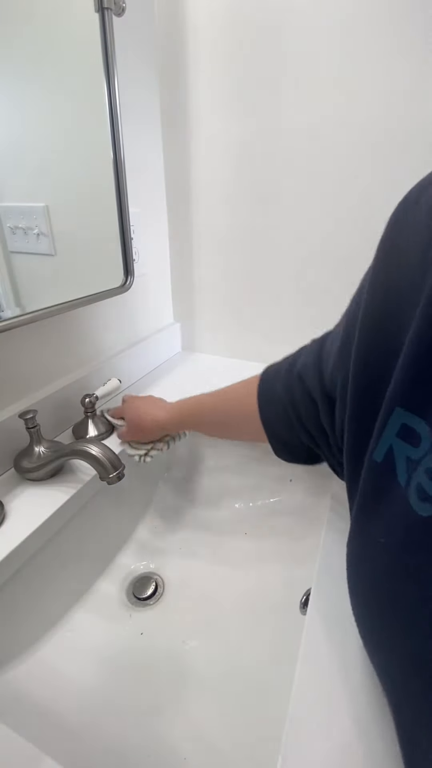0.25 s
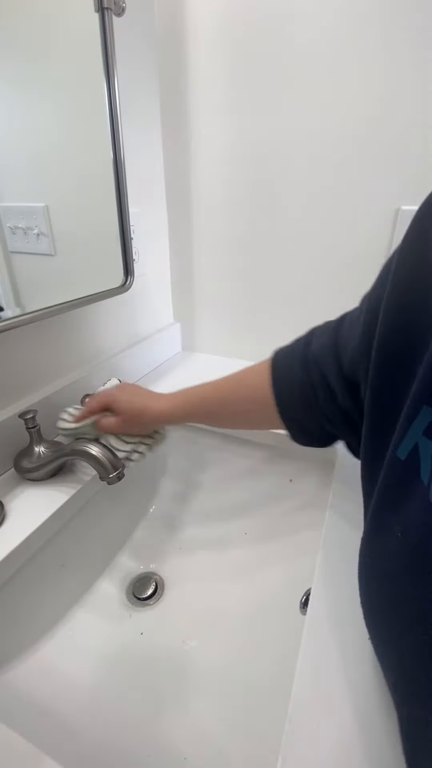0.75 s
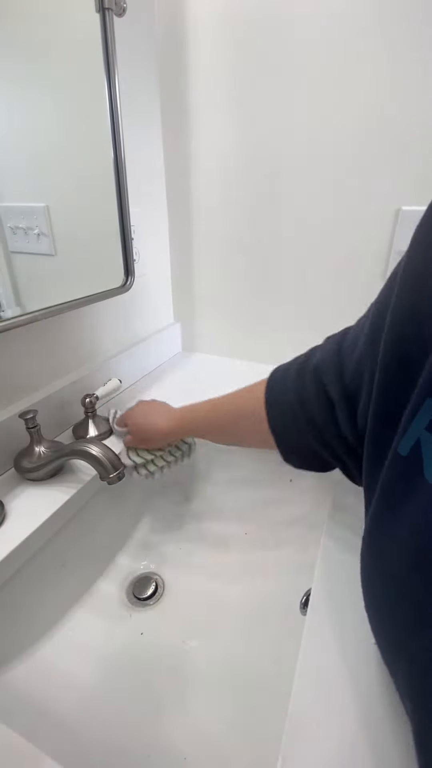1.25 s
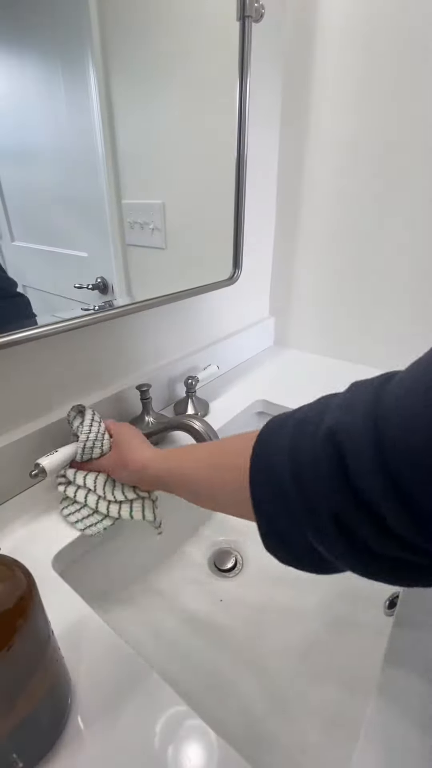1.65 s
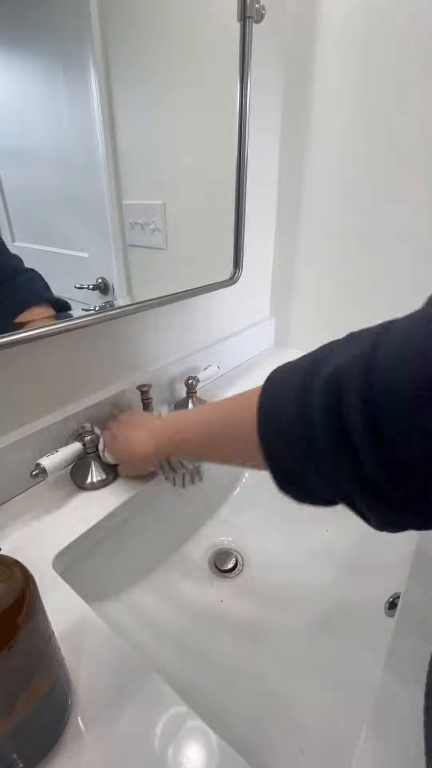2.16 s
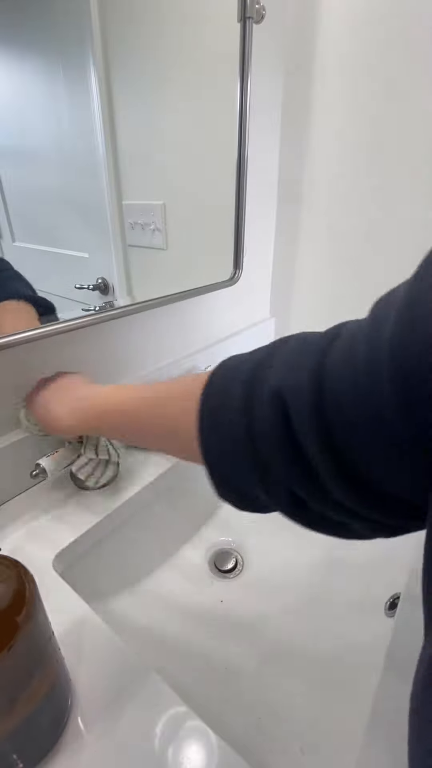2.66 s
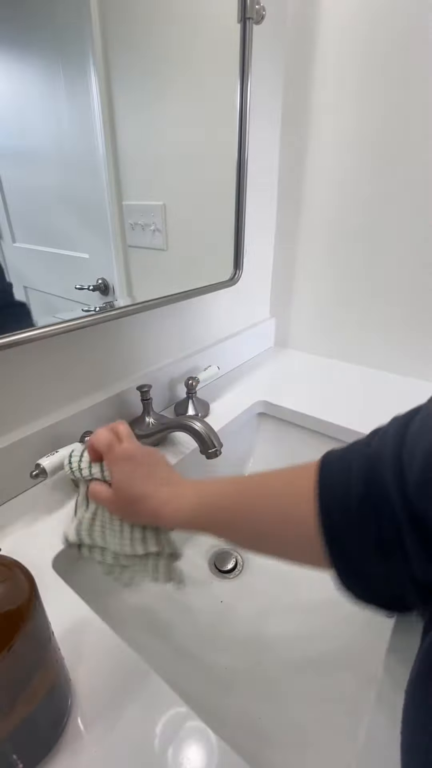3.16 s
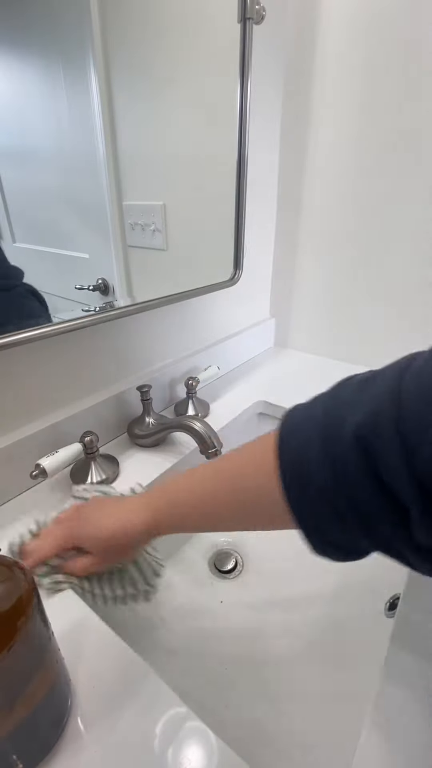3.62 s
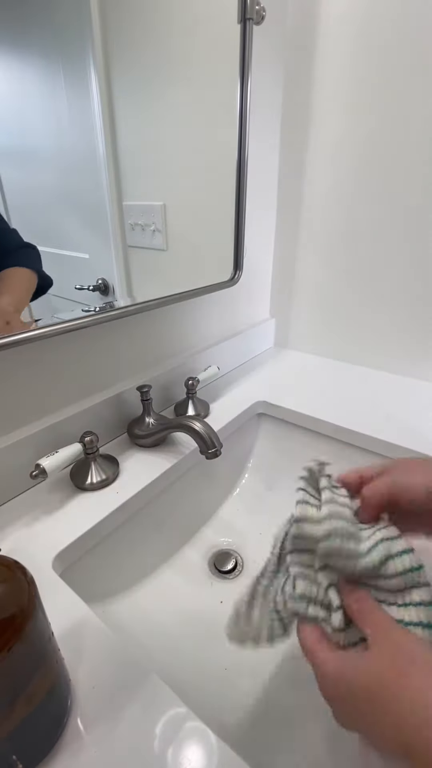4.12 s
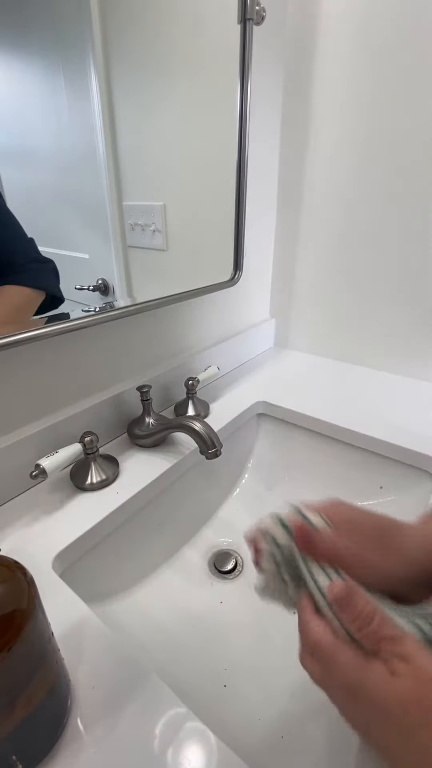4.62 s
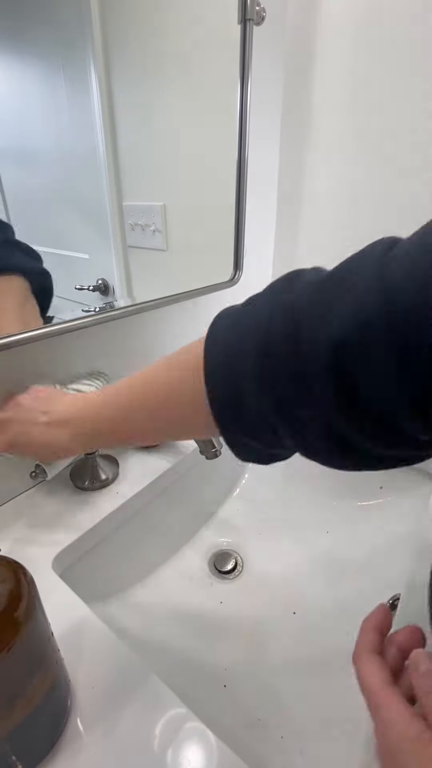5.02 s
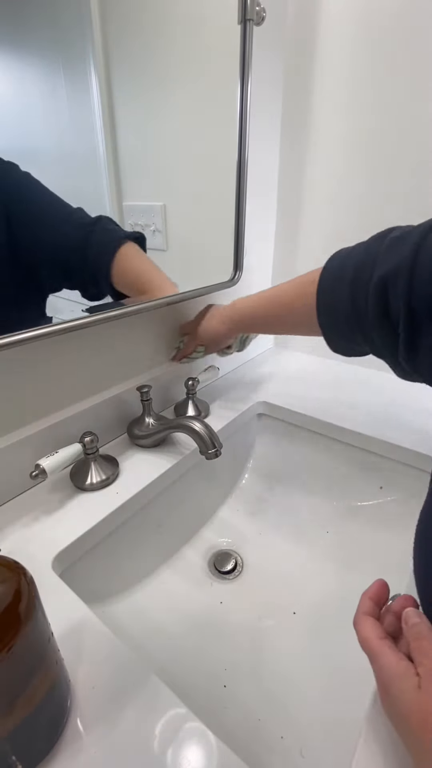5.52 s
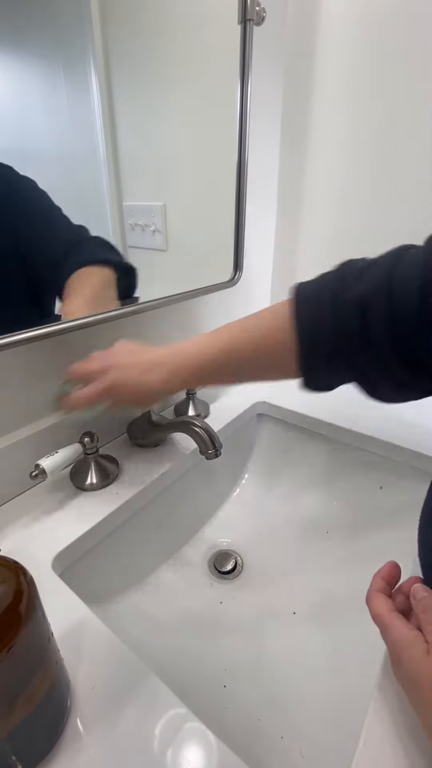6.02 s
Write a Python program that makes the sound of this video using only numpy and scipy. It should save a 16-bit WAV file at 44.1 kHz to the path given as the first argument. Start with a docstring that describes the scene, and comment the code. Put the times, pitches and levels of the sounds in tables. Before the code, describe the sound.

Quiet, close cloth wiping around a sink, light bumps and fitting clicks, one loud clack-and-thump, a tiny squeak, then two stronger swipes.

```python
"""A cloth wipes a bathroom counter in short strokes of filtered noise, over a motor's steady hum of sines.
Early on a hollow note wavers in the basin; bumps boom in the cabinet as swelling sines, and fittings click
as spikes with dying modes. Halfway, a sharp clack at 2.9 s is followed at once by a heavy thump; then the cloth
squeaks once, a gliding tone. Lighter bumps and clicks go on, then two louder strokes close the scene.
Short grainy bursts (cloth folds, brief rattles round the clack) and a low, uneven drag (dark noise) run along."""
import sys
import numpy as np
from scipy import signal
from scipy.fft import rfft, irfft
from scipy.io import wavfile
from scipy.ndimage import uniform_filter1d

SR = 44100
rng = np.random.default_rng(int(sys.argv[2]) if len(sys.argv) > 2 else 0)


def materialize(psi):
    """Save the field psi as 16-bit PCM at rate SR to the path in sys.argv[1].

    A 1-D psi becomes a single channel; in a 2-D psi each row is a channel.
    """
    bounded = np.clip(np.atleast_2d(psi).T, -1, 1)
    quanta = np.round(bounded * 32767).astype(np.int16)
    wavfile.write(sys.argv[1], SR, quanta)


N = 276948
TIME, BINS = np.arange(N) / SR, np.fft.rfftfreq(N, 1 / SR)
CONTROL_TIME = TIME[::32]  # coarser clock for the stroke envelopes

# Strokes of the cloth. Each row: start in seconds, length in seconds, relative hiss in dB, swell from start
# to end in dB, brightness in dB per octave, rasp in dB, rumble in dB, relative scuff in dB.
STROKES = [(-0.03, 0.14, -66.5, -1, -2.5, 1.5, -70, -76.5), (0.087, 0.13, -66.5, -10, -4.5, 5, -58.5, -94),
           (0.174, 0.17, -60.5, -5.5, -2.5, 4.5, -66, -84), (0.322, 0.099, -60.5, 1, -2, 0.5, -66.5, -88),
           (0.445, 0.043, -67.5, -5, 0, 1, -58.5, -73.5), (0.509, 0.18, -63, 7, -1.5, 0.5, -57, -82),
           (0.763, 0.11, -63, -3.5, -2, -1.5, -56.5, -77), (0.853, 0.22, -62, 7, -2.5, 2, -65, -79),
           (1.112, 0.18, -58, 8.5, -2, 2, -68.5, -73.5), (1.328, 0.29, -73.5, 4, -0.5, -5, -67.5, -76),
           (1.482, 0.3, -70, 7, -1.5, 0, -72, -79.5), (1.821, 0.15, -71, 15, -2.5, -1, -66.5, -74),
           (1.977, 0.14, -70, -2, -2, -2, -73, -74), (2.096, 0.11, -63.5, -7, -5.5, -10, -61.5, -65.5),
           (2.204, 0.1, -63.5, 1, -3.5, -1, -63.5, -71), (2.501, 0.049, -76, 1, 6.5, 2, -62, -69.5),
           (2.55, 0.08, -59.5, -6, -2, 3.5, -61.5, -67.5), (2.636, 0.2, -52.5, 0.5, 0, 3.5, -91, -70.5),
           (2.836, 0.57, -78.5, -37, 2, -3, -73, -69.5), (3.2, 0.11, -71, 2, -1.5, -2, -58.5, -76),
           (3.28, 0.12, -62.5, -11, -5.5, -12, -65, -66.5),
           (3.359, 0.31, -65.5, 0, -2.5, -5.5, -65.5, -72.5), (3.713, 0.21, -70.5, 10, 1, 3.5, -66, -81),
           (3.886, 0.29, -69, -20.5, 2, 0, -70.5, -73), (4.225, 0.12, -76, -14, 1.5, 3.5, -75, -96),
           (4.374, 0.047, -76, 6, -2, -2, -66, -84), (4.46, 0.26, -72, 5, -3, -0.5, -68.5, -75.5),
           (4.733, 0.076, -72, -1.5, -5, -9, -65, -67.5), (4.82, 0.34, -81, -11, -4.5, 1.5, -66, -91),
           (5.02, 0.7, -58, -4, 0, 1, -70.5, -66), (6.109, 0.38, -56, -6.5, -1.5, -3, -65.5, -66.5)]
# Short grainy bursts in bands of their own: cloth folds, and brief rattles around the clack and thump.
# Each row: start in seconds, length in seconds, level in dB, centre in Hz, width in octaves.
BURSTS = [(0.076, 0.1, -70, 1540, 0.17), (0.205, 0.092, -68.5, 1200, 0.96), (1.014, 0.049, -72, 1100, .6),
          (1.725, .09, -72, 1330, 0.47), (2.226, 0.038, -70, 1500, 0.77), (2.899, 0.004, -46, 2950, 0.24),
          (2.953, 0.11, -65.5, 2530, 1), (3.013, 0.033, -54, 5440, 0.96), (3.048, 0.052, -63.5, 1930, .3),
          (3.343, 0.12, -79, 1500, 0.36), (3.621, 0.049, -61.5, 1340, 0.4), (3.867, .21, -84, 1860, 1),
          (3.854, 0.27, -65, 5200, 0.65), (4.562, 0.035, -68.5, 1390, 1), (4.664, 0.045, -69, 1200, 1),
          (4.782, .02, -75, 1400, 0.98), (4.857, 0.028, -74, 1200, 1), (5.086, 0.36, -70.5, 1280, 0.44)]
# The one squeak on the glaze: start in seconds, length in seconds, pitch in Hz, glide in Hz per second, level in dB.
SQUEAK = (3.312, .115, 1185, 150, -60.5)
# Bumps on the counter. Each row: start in seconds, boom in dB, boom pitch at its peak in Hz, time to swell
# in seconds, relative knock in dB, knock brightness in dB per octave, ring of the slab in dB.
BUMPS = [(0.067, -51.5, 230, 0.021, -47, -11, -69.5), (0.178, -48, 135, 0.02, -57, 2, -83),
         (0.528, -28.5, 145.5, 0.031, -38, -9.5, -99), (0.585, -46.5, 157, 0.032, -72, -23, -94),
         (0.819, -45, 142, 0.022, -56, -2, -91), (1.304, -46.5, 170, 0.0025, -48, -1.5, -66),
         (1.839, -48.5, 205, 0.0054, -57, 0, -64), (2.161, -46.5, 196, 0.0068, -37, -6, -61),
         (2.184, -50.5, 203, 0.019, -52.5, 5.5, -72), (2.963, -9, 150.4, 0.02, -32, 1, -49.5),
         (3.0, -34.5, 190, 0.012, -31.5, 5, -49.5), (3.025, -29, 157.4, 0.028, -28, -5.5, -54),
         (3.356, -46.5, 152, 0.018, -50, 10, -77), (3.635, -42, 147, 0.023, -43.5, -8, -69),
         (3.775, -48.5, 145.4, 0.03, -65, -22, -74), (3.956, -51, 146, 0.0065, -69, -2, -78),
         (4.23, -54, 145, 0.014, -54.5, -12, -79.5)]
# Low modes of cabinet and room. Each row: pitch in Hz, level against the boom in dB, t60 in seconds.
CABINET_MODES = [(103.9, -18.5, 0.46), (135, -5.5, 0.35), (164, -17, 0.36), (211.6, -6, 0.2)]
# Modes of the slab under a bump. Each row: pitch in Hz, relative level in dB, t60 in seconds.
SLAB_MODES = [(301.5, -1, 0.39), (400, -13, 0.047), (463, -2.5, 0.36), (673, 5.5, 0.14), (744, 4, .22),
              (885, 4.5, 0.12), (960, -9.5, 0.08), (1030, -6, 0.1), (1130, 0.5, 0.28), (1320, -8.5, 0.17),
              (1430, -10, 0.097), (1800, -21, 0.17), (2230, -28, 0.22), (2230, -22.5, 0.24)]
# Clicks on the fittings. Each row: start in seconds, level in dB, brightness in dB per octave,
# ring against the crack in dB.
CLICKS = [(1.309, -38, 1, -12), (1.558, -29, 2.5, -26), (2.897, -32.5, -9, -33), (2.908, -10.5, 0.5, -12.5),
          (2.921, -27, -4, -24), (2.929, -35.5, 0, -20), (3.0181, -28, 6.5, -31), (4.239, -55, 9, -31),
          (4.785, -49, 6, -22)]
# Modes of the metal fittings. Each row: pitch in Hz, relative level in dB, t60 in seconds.
METAL_MODES = [(2440, -44, 0.06), (3070, -1.5, 0.015), (3620, -1, 0.0059), (4600, -3.5, 0.0086),
               (6360, -6, 0.014), (7600, -2, 0.0057), (8240, -5.5, 0.008), (9130, -8, .008),
               (10700, -9, 0.0033)]
# Modes of the basin, shaken through the tap. Each row: pitch in Hz, relative level in dB, t60 in seconds.
BASIN_MODES = [(700, -26.5, 0.37), (907, -22.5, 0.16), (1160, -13, .16), (1270, -7, 0.11),
               (1343, -4.5, 0.2), (1330, 16, 0.017), (1490, -13, 0.13), (1797, 7.5, 0.012),
               (1676, -24, 0.26), (2000, -4, 0.01)]
# Hollow note in the basin while the cloth works beside it. Each row: time in seconds, pitch in Hz, level in dB.
HOLLOW = [(0.29, 700, -99), (0.357, 679, -71), (0.68, 612, -79), (.82, 641, -69.5), (.98, 623, -92),
          (1.13, 632, -69), (1.38, 606, -87), (1.58, 647, -66), (1.749, 680, -106)]
# Tones of the hum. Each row: pitch in Hz, level in dB rms before the drift, depth of the wavering in dB.
HUM = [(139.5, -76, 2.5), (216.7, -66, 1.5), (259, -78.5, 3), (459, -88.5, 0.5), (598, -78.5, 0)]
# Drift of the hum's level. Each row: time in seconds, gain in dB.
HUM_LEVEL = [(0, -2), (1.25, -0.5), (1.4, 1.5), (2.4, 0), (6.28, 1.5)]

# Colours of the noises. Each row: frequency in Hz, relative density in dB per Hz.
CLOTH_COLOUR = [(200, -14.5), (700, -15.5), (1350, -10), (2100, -4.5), (3200, 0), (4400, 1.5), (6000, 0),
                (7500, 0.5), (9500, 4), (12000, 2.5), (16000, -2)]
RUMBLE_COLOUR = [(25, -44.5), (60, -17), (100, 5.5), (140, 4.5), (190, -10.5), (300, -25), (600, -60.5)]
SCUFF_COLOUR = [(120, -26), (260, -3.5), (420, -2), (640, 1), (900, -5), (1400, -10), (2200, -12.5),
                (6000, -23.5)]
KNOCK_COLOUR = [(30, -26.5), (100, -1), (300, 9.5), (440, 0), (700, 2), (950, -6), (1400, -11),
                (2300, -27.5), (5000, -42.5), (16000, -62)]
SHUDDER_COLOUR = [(15, -46), (28, -23), (45, -7), (90, -4.5), (150, -13), (400, -56)]  # the deep shudder under a blow
AIR_COLOUR = [(25, -34), (70, -5), (130, 6), (220, 2), (380, -10), (600, -4), (900, -14), (1600, -20),
              (3000, -26), (7000, -28), (16000, -26)]
# Decay of the room. Each row: frequency in Hz, t60 in seconds.
ROOM_DECAY = [(300, 0.59), (1400, 0.24), (3500, 0.21), (9000, 0.07), (16000, 0.016)]
# Likeness of the two microphone ports. Each row: frequency in Hz, likeness from 0 to 1.
LIKENESS = [(150, .999), (300, .95), (600, .7), (850, .5), (1350, .72), (2000, .42), (3200, .75),
            (5500, .62), (9000, .62), (11000, .45), (12500, .85)]
# Phase between the ports. Each row: frequency in Hz, lead of the left in radians.
PORT_PHASE = [(40, 0), (160, -.07), (330, -.25), (650, -1), (1100, -2.5), (1600, -3.8), (2700, -6.1),
              (3400, -6), (4500, -4.9), (5600, -5), (6800, -5.8), (8200, -5), (9800, -5.9), (12000, -3.2),
              (14000, -3.1), (16000, -1.5)]
# Balance of the ports. Each row: frequency in Hz, left minus right in dB.
PORT_BALANCE = [(200, .4), (330, 0), (600, -4), (1300, -1.2), (4000, -1.8), (8000, -2), (13000, -.2)]

LIFT_DB_PER_S, SETTLE_DB_PER_S = 250.5, 157  # how fast the hiss, and the counter's shaking, die after a stroke
ATTACK_S, ATTACK_SHARE = 0.015, 0.064  # the hand gets up to speed in this time plus this share of the stroke
ARCH_DB = 2.5  # a stroke is this much quieter at its ends than in the middle
# The rasp of the weave: centre, width, and octaves it climbs during a stroke.
RASP_HZ, RASP_OCTAVES, RASP_SWEEP = 4500, 0.26, 0.15
BOOM_SAG_HZ_PER_S = 620  # every boom drops in pitch this fast
EDGE_HZ = 15900  # top of the ports' band


def cloth(hiss_db=2.0, snag_db=-8, snags_per_s=500, flutter_db=1.1, patchy_db=1.85, idle_db=-92):
    """Countless fibres slip as a soft hiss, a few threads snag and let go, and the pressed weave rasps."""
    start, length, level_db, _, bright_db, rasp_db = np.transpose(STROKES)[:6]
    gains = strokes(LIFT_DB_PER_S)
    # between strokes the cloth barely stirs
    level = np.hypot(played(gains, level_db), amp(idle_db))
    slide = level * amp(flutter_db * wander(29))

    snags = (rng.random(N) < snags_per_s / SR) * rng.laplace(size=N)
    fibres = amp(hiss_db) * noise(CLOTH_COLOUR)
    fibres[0] += amp(snag_db) * colour(snags, CLOTH_COLOUR)
    hz, t, z = signal.stft(fibres, SR, nperseg=1024)

    # where strokes overlap, each colours the hiss by its share of the gain
    shares = gains / (gains.sum(0) + 1e-3)
    share = np.array([np.interp(t, CONTROL_TIME, s) for s in shares])
    progress = np.clip((t - start[:, None]) / length[:, None], 0, 1)
    along = (share * progress).sum(0)
    off_centre = np.log2((hz[:, None] + 1) / RASP_HZ) - RASP_SWEEP * (along - .5)
    rasp = rasp_db @ share * np.exp(-(off_centre / RASP_OCTAVES) ** 2)

    # the hiss varies in colour by chance, in slow random patches
    patches = uniform_filter1d(rng.standard_normal(z.shape[1:]), size=7, axis=0)
    patches = unit(uniform_filter1d(patches, size=9, axis=1))
    octaves = np.log2(np.clip(hz, 1000, 16000) / 6000)[:, None]
    z = z * amp(patchy_db * patches + rasp + octaves * (bright_db @ share))
    return slide * signal.istft(z, SR, nperseg=1024)[1][:, :N]


def strokes(release_db_per_s):
    """One gain curve per stroke: a soft start, an arch that leans to one end, and a release."""
    start, length, _, swell_db = np.transpose(STROKES)[:4, :, None]
    age = np.maximum(CONTROL_TIME - start, 0)
    along = np.minimum(age / length, 1)
    arch_db = swell_db * (along - .5) - ARCH_DB * (2 * along - 1) ** 2
    release_db = release_db_per_s * np.maximum(age - length, 0)
    attack = 1 - np.exp(-(age / (ATTACK_S + ATTACK_SHARE * length)) ** 2)
    return attack * amp(arch_db - release_db)


def played(gains, levels_db):
    """The level over time of all strokes together, their powers summed, each at its own strength."""
    return np.interp(TIME, CONTROL_TIME, np.sqrt(amp(levels_db) ** 2 @ gains ** 2))


def grainy_bursts(grains_per_s=1500, hiss_db=-2, lean=.8):
    """Each burst is a short spray of soft crackles and hiss in a band of its own, swelling and fading."""
    out = np.zeros((2, N))
    for s, length, db, hz, octaves in BURSTS:
        along = np.clip(np.arange(16384) / SR / length, 0, 1)
        size = (2, len(along))
        grains = (rng.random(size) < grains_per_s / SR) * rng.laplace(size=size)
        hiss = amp(hiss_db) * rng.standard_normal(size)
        # a bell-shaped band, 7 dB down one width from its centre
        band = [(hz * 2 ** (k * octaves), -7 * k ** 2) for k in range(-3, 4)]
        spray = colour(unit(grains) + hiss, band)
        add(out, s, amp(db) * np.sin(np.pi * along ** lean) * spray)
    return out


def squeak(rough_hz=14, peak_share=0.19):
    """The cloth sticks and slips fast enough to give a short, slightly rough tone."""
    s, length, hz, glide, db = SQUEAK
    along = np.clip((TIME - s) / length, 0, 1)
    pitch = hz + glide * length * along + rough_hz * wander(110)
    turns = np.cumsum(pitch) / SR
    swell = np.interp(along, [0, peak_share, 1], [0, 1, 0])
    return np.array([amp(db) * swell * np.sin(2 * np.pi * turns), np.zeros(N)])


def drag(scuff_db=3, uneven_db=2):
    """In each stroke the hand's weight catches and slips: an uneven rumble of the counter and scuff of the basin."""
    low_db, mid_db = np.transpose(STROKES)[-2:]
    gains = strokes(SETTLE_DB_PER_S)
    grip_db = uneven_db * wander(16.0)
    rumble = played(gains, low_db) * noise(RUMBLE_COLOUR)
    scuff = played(gains, mid_db + scuff_db) * noise(SCUFF_COLOUR)
    return amp(grip_db) * (rumble + scuff)


def bumps(ring_rise=0.018, knock_t60=0.17, knock_db=-6, punch_db=6, punch_t60=0.012, slab_rise=0.0029,
          spot_db=2, shudder_db=-36, shudder_t60=0.71):
    """A padded blow swells in the hollow cabinet and rings its low modes, under a dull knock and the slab's ring."""
    out, t = np.zeros((2, N)), np.arange(32768) / SR
    ring = modes(CABINET_MODES, t) * (1 - np.exp(-(t / ring_rise) ** 2))
    # the knock itself, then its wash round the room
    dying = amp(punch_db - 60 * t / punch_t60) + amp(-60 * t / knock_t60)
    for s, boom_db, hz, swell, hard_db, bright_db, slab_db in BUMPS:
        turns = hz * t - BOOM_SAG_HZ_PER_S * (t - swell) ** 2 / 2
        boom = (t / swell * np.exp(1 - t / swell)) ** 4 * np.sin(2 * np.pi * turns)
        onset = 1 - np.exp(-(t / (0.22 * swell)) ** 2)
        deep = colour(rng.standard_normal(len(t)), SHUDDER_COLOUR)
        shudder = onset * amp(shudder_db - 60 * t / shudder_t60) * deep
        add(out[0], s, amp(boom_db) * (boom + ring + shudder))

        # each blow lands on another spot and so stirs the modes differently
        slab = 0
        for mode in SLAB_MODES:
            spot = amp(spot_db * rng.standard_normal()) * rng.choice([-1, 1])
            slab = slab + spot * modes([mode], t)
        add(out[0], s, amp(slab_db) * (1 - np.exp(-t / slab_rise)) * slab)

        knock = colour(rng.standard_normal((2, len(t))), KNOCK_COLOUR, bright_db)
        add(out, s, amp(knock_db + hard_db) * dying * onset * knock)
    return out


def clicks(crack_db=-15, crack_t60=0.012, room_db=-3, room_tilt_db=-4.0, basin_rise=0.0036, top_hz=12800):
    """Hard contacts on the tap and its handles: a spike, a brief crackle and short, hand-damped modes."""
    cracks, rings, t = 0, 0, np.arange(16384) / SR
    octaves = np.log2(np.clip(BINS, 1200, 12000) / 4000)
    # small parts give off no bass, and the time of contact softens the very top
    no_bass = BINS ** 2 / np.hypot(BINS ** 2, 1100 ** 2)
    small = no_bass / np.hypot(1, (BINS / top_hz) ** 5)
    # the basin answers a moment later than the metal
    ring = modes(METAL_MODES, t) + modes(BASIN_MODES, t) * (1 - np.exp(-(t / basin_rise) ** 2))
    for s, level_db, bright_db, ring_db in CLICKS:
        crackle = amp(crack_db - 60 * t / crack_t60) * rng.standard_normal(len(t))
        spike = t == 0
        hit = np.zeros((2, N))
        add(hit, s, np.array([spike + crackle, amp(ring_db) * ring]))
        crack, rung = irfft(rfft(hit) * amp(level_db + bright_db * octaves) * small, N)
        cracks, rings = cracks + crack, rings + rung
    # the room hands back the middle of the crack more than its top
    wet = amp(room_db) * room(irfft(rfft(cracks) * amp(room_tilt_db * octaves), N))
    # the broad basin radiates from all round, so part of the ring is diffuse
    return wet + np.array([cracks + rings, 0.51 * rings])


def room(x):
    """Dense reflections off tile and mirror, each band dying at its own speed."""
    taps = rng.standard_normal((2, SR // 2))
    hz, t, z = signal.stft(taps, SR, nperseg=256)
    decay = amp(-60 * t / read(ROOM_DECAY, hz)[:, None])
    tail = signal.istft(z * decay, SR, nperseg=256)[1]
    tail *= np.clip(np.arange(tail.shape[1]) / SR / 0.0056, 0, 1) ** 2  # builds up over 5.6 ms
    return signal.fftconvolve(x[None], tail / np.linalg.norm(tail[0]), axes=1)[:, :N]


def hollow(width_hz=28):
    """A faint, fuzzy basin note that wavers in pitch: two slow noises carried on a cosine and a sine."""
    s, hz, db = np.transpose(HOLLOW)
    angle = 2 * np.pi * np.cumsum(np.interp(TIME, s, hz)) / SR
    note = wander(width_hz) * np.cos(angle) + wander(width_hz) * np.sin(angle)
    level = amp(np.interp(TIME, s, db, left=-np.inf, right=-np.inf))  # silent outside the table
    return np.array([note * level, np.zeros(N)])


def hum(air_db=-71, drift_share=0.005):
    """A motor's steady tones waver a little over a low rush of air."""
    out = amp(air_db) * noise(AIR_COLOUR)
    drift_db = np.interp(TIME, *np.transpose(HUM_LEVEL))
    for hz, db, depth_db in HUM:
        turns = np.cumsum(hz * (1 + drift_share * wander(9.5))) / SR
        waver_db = depth_db * wander(3.5)
        out[0] += np.sqrt(2) * amp(db + waver_db + drift_db) * np.sin(2 * np.pi * turns)
    return out


def modes(table, t):
    """The sum of a body's dying tones."""
    return sum(amp(db - 60 * t / t60) * np.sin(2 * np.pi * hz * t) for hz, db, t60 in table)


def noise(spectrum):
    """Two unrelated noises of one colour."""
    return colour(rng.standard_normal((2, N)), spectrum)


def colour(x, spectrum, tilt_db=0):
    """Gives a signal a spectrum, tilted by so many dB per octave above 150 Hz, at rms 1."""
    hz = np.fft.rfftfreq(x.shape[-1], 1 / SR)
    shape_db = read(spectrum, hz) + tilt_db * np.log2(np.maximum(hz, 150))
    return unit(irfft(rfft(x) * amp(shape_db), x.shape[-1]))


def wander(rate_hz):
    """Slow chance: noise rolled off above a rate, at rms 1."""
    return unit(irfft(rfft(rng.standard_normal(N)) / (1 + (BINS / rate_hz) ** 4), N))


def read(points, hz):
    """Joins the points of a table on a log-frequency axis."""
    f, value = np.transpose(points)
    return np.interp(np.log(hz + 1), np.log(f), value)


def amp(db):
    """Decibels to gain."""
    return 10 ** (np.asarray(db) / 20)


def unit(x):
    """Scales to rms 1."""
    return x / np.sqrt(np.mean(x ** 2) + 1e-20)


def add(mix, s, sound):
    """Lays a sound into the mix at a time in seconds."""
    part = mix[..., round(s * SR):][..., :sound.shape[-1]]
    part += sound[..., :part.shape[-1]]


def scene():
    """Row 0 of each source reaches both ports alike; row 1 is the diffuse part that sets them apart."""
    wiping = cloth() + squeak() + drag()
    common, diffuse = rfft(wiping + grainy_bursts() + bumps() + clicks() + hollow() + hum())
    like = np.clip(read(LIKENESS, BINS), 0, 1)
    side = np.array([[1], [-1]])  # left, right
    ports = np.sqrt((1 + like) / 2) * common + side * np.sqrt((1 - like) / 2) * diffuse
    ports[0] *= np.exp(1j * read(PORT_PHASE, BINS))
    return irfft(ports * amp(side * read(PORT_BALANCE, BINS) / 2), N)


def record(dry):
    """The recorder's band limit: a steep low-pass."""
    low_pass = signal.firwin(511, EDGE_HZ, window=("kaiser", 9), fs=SR)
    return signal.oaconvolve(dry, low_pass[None], "same")


dry = scene()
out = record(dry)
materialize(out)
```